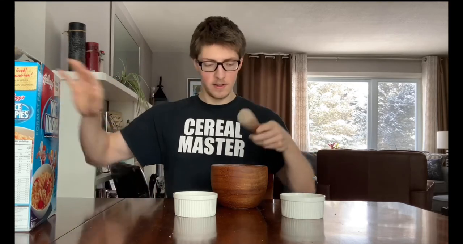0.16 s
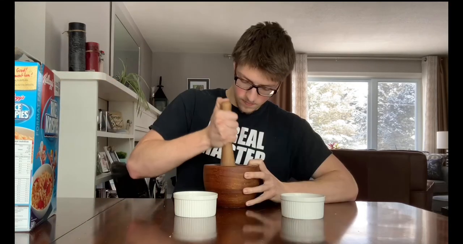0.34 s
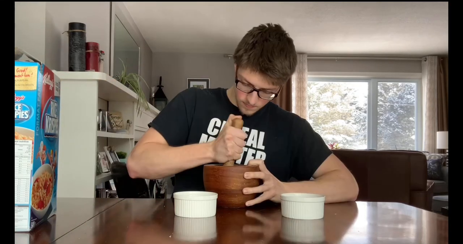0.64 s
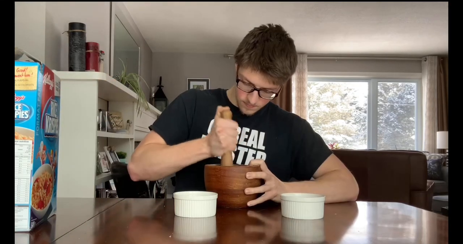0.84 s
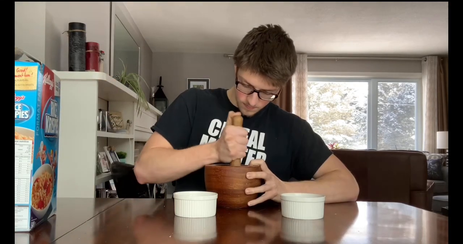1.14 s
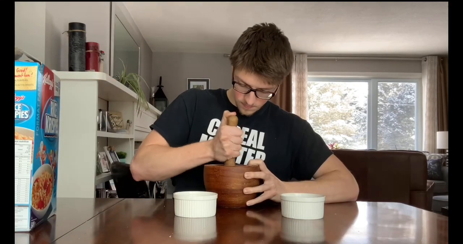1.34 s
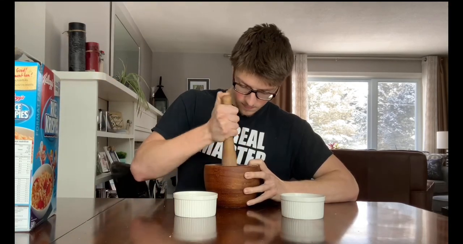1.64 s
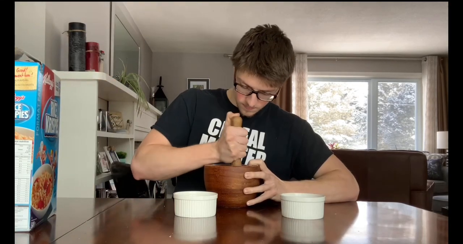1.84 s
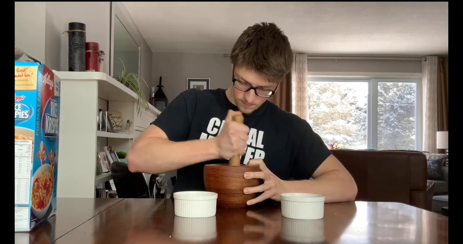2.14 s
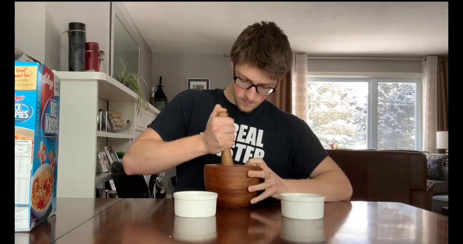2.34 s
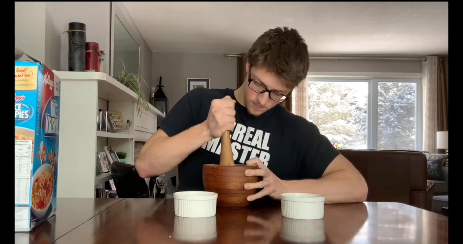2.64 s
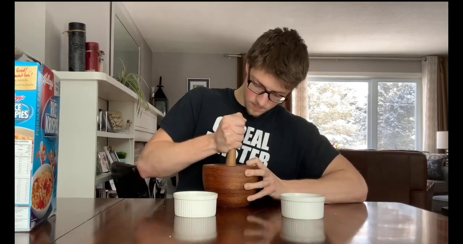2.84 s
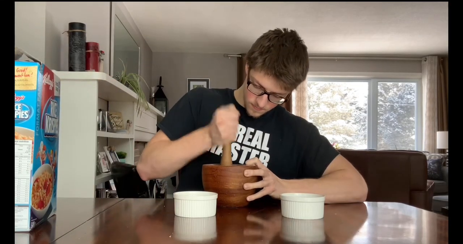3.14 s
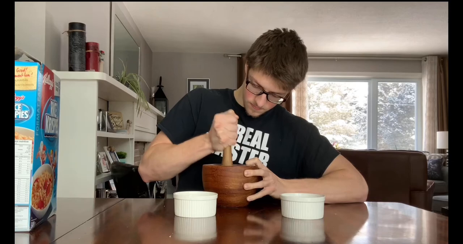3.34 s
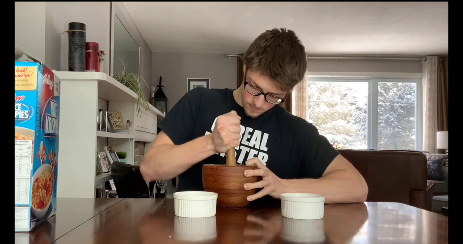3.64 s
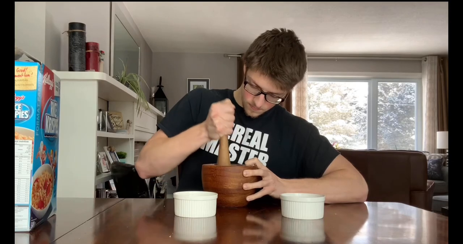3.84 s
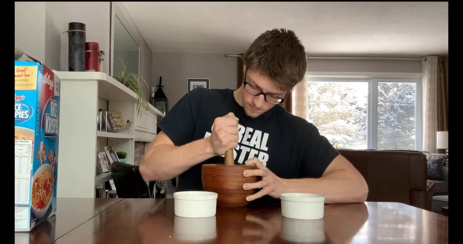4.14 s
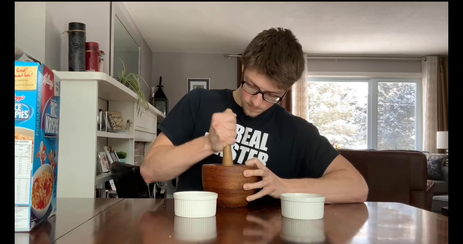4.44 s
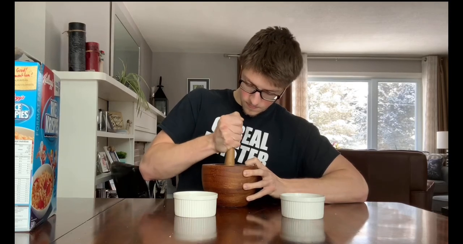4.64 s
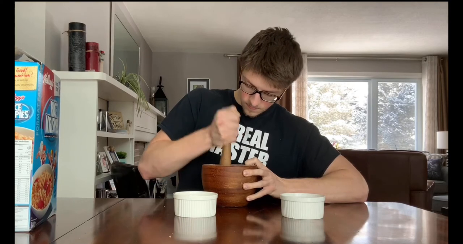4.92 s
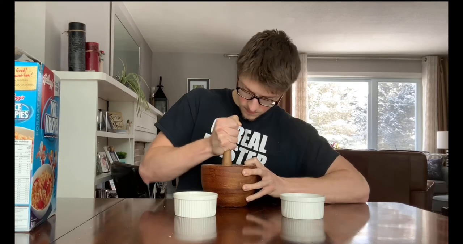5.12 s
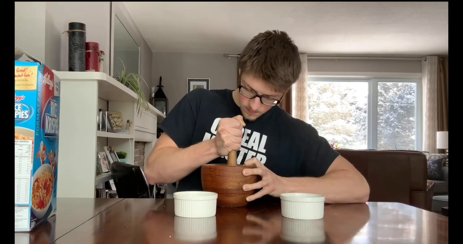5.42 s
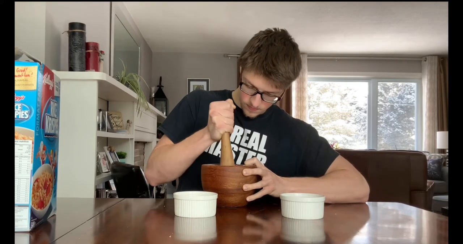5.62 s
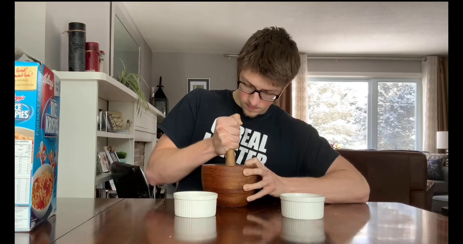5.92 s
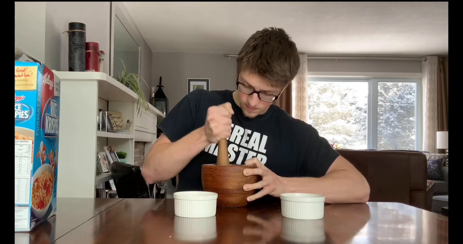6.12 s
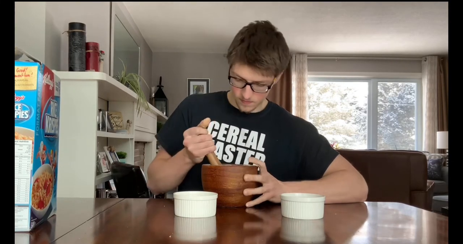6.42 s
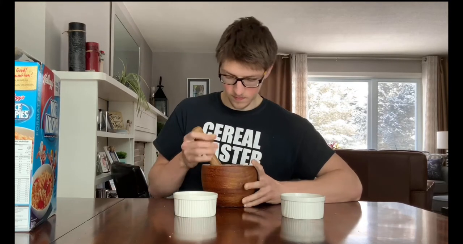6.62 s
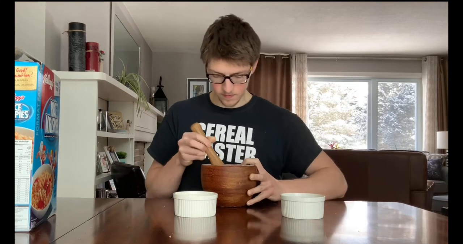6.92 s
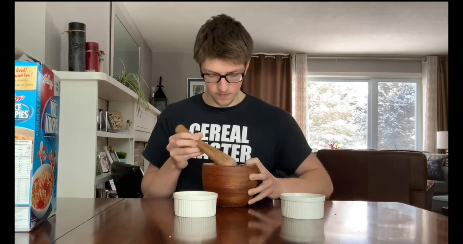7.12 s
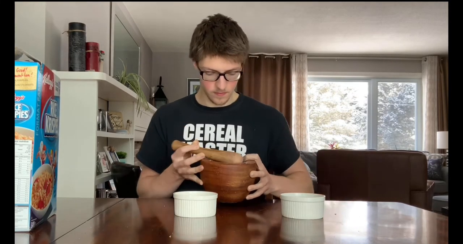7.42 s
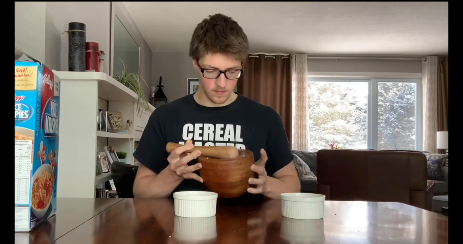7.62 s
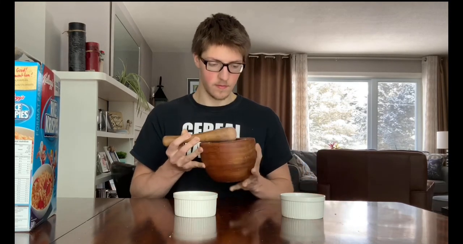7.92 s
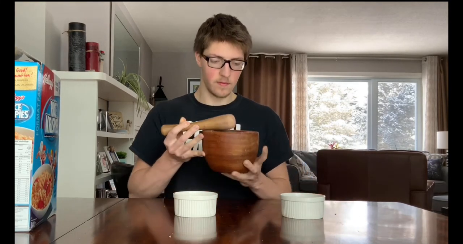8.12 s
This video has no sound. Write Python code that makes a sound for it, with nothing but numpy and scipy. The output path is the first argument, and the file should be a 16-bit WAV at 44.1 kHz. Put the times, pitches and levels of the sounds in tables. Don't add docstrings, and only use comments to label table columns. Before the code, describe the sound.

In a small living room, a wooden pestle crushes dry flakes in a wooden bowl on a table. Brittle crackling bursts come roughly twice a second, with gritty dragging and low wooden judder between them. After six seconds the crunching gives way to light taps, a faint slide and a hollow knock as the pestle rests on the rim. The stereo microphone is a metre or two away, over low fan rumble.

```python
import sys
import numpy as np
from scipy import signal
from scipy.fft import rfft, irfft, next_fast_len
from scipy.io import wavfile
from scipy.ndimage import uniform_filter1d

SR = 44100
rng = np.random.default_rng(int(sys.argv[2]) if len(sys.argv) > 2 else 0)


def linear_from_db(decibels):
    return 10 ** (np.asarray(decibels, float) / 20)


def to_wav(s):
    ch = np.atleast_2d(s).T
    pcm = np.round(np.clip(ch, -1, 1) * 32767)
    wavfile.write(sys.argv[1], SR, pcm.astype(np.int16))


N = 364707
SIZE = next_fast_len(N)


def level(x, db):
    return x * linear_from_db(db) / np.sqrt(np.mean(x ** 2))


def over_hz(points, size):
    hz, value = np.transpose(points)
    return np.interp(np.log(np.fft.rfftfreq(size, 1 / SR) + 1), np.log(hz + 1), value)


def colour(x, points, size=4096):
    cepstrum = irfft(np.log(linear_from_db(over_hz(points, size))))
    cepstrum[1:size // 2] *= 2
    cepstrum[size // 2 + 1:] = 0
    response = irfft(np.exp(rfft(cepstrum)))
    return signal.oaconvolve(x, response)[:len(x)]


def body(x, modes):
    total = 0
    for k, (hz, width, db) in enumerate(modes):
        total = total + (-1) ** k * linear_from_db(db) * signal.lfilter(*signal.iirpeak(hz, hz / width, SR), x)
    return total


def grains(rate, spread_db):
    hit = rng.random(N) < rate / SR
    size = np.minimum(rng.exponential(size=N), 4.5)
    return level(hit * rng.standard_normal(N) * linear_from_db(spread_db * size), 0)


def walk(rate):
    hold = int(SR / rate)
    steps = np.repeat(rng.standard_normal(N // hold + 1), hold)
    return 1.16 * uniform_filter1d(uniform_filter1d(steps, hold), hold)[:N]


def impulses(time_s, gains):
    push = np.zeros((len(gains), N))
    push[:, np.minimum((time_s * SR).astype(int), N - 1)] = gains
    return push


def power_sum_db(a_db, b_db):
    return 10 * np.log10(linear_from_db(a_db) ** 2 + linear_from_db(b_db) ** 2)


def swells(rows, rise_power, fall_power, rest_db=-100):
    t = np.arange(0, N / SR + .01, .001)
    start, peak_db, rise, fall = np.array(rows, float).T[:, :, None]
    up = np.clip((t - start) / np.maximum(rise, .002), 0, 1) ** rise_power
    down_db = -20 * (np.maximum(t - start - rise, 0) / np.maximum(fall, .005)) ** fall_power
    power = np.sum((up * linear_from_db(peak_db + down_db)) ** 2, axis=0) + linear_from_db(rest_db) ** 2
    return np.interp(np.arange(N) / SR, t, 10 * np.log10(power))


def room_tone():
    # (frequency [Hz], density [dB per Hz])
    room = [(25, -38), (40, -21.5), (78, -3), (93, 1.5), (106, -3), (120, -1.5), (135, -4.5), (180, -15),
            (260, -24.5), (450, -24), (700, -41), (1200, -34.5), (1550, -40), (2100, -53.5), (5000, -58.5),
            (9000, -51), (13000, -62), (15000, -67), (16000, -70)]
    # (frequency [Hz], likeness [0-1])
    likeness = [(100, 1), (250, 0.79), (450, 0), (1800, 0.24), (3000, 0.6), (4500, 0.6), (6500, .99)]
    # (frequency [Hz], width [Hz], level [dB], flicker
    # [dB])
    whistles = [(14520, 300, -78, 6), (9000, 2500, -87, 3)]
    mid, side = (colour(rng.standard_normal(N), room, size=16384) for _ in range(2))
    alike = np.clip(over_hz(likeness, SIZE), 0, 1)
    side = irfft(rfft(side, SIZE) * np.sqrt((1 - alike) / (1 + alike)), SIZE)[:N]
    air = level(np.array([mid + side, mid - side]), -42) * linear_from_db(1.1 * walk(3.144))
    for hz, width, db, flicker_db in whistles:
        tone = body(rng.standard_normal(N), [(hz, width, 0)])
        air = air + level(tone * linear_from_db(flicker_db * np.tanh(2 * walk(48))), db)
    return air


def efforts():
    # (start [s], crackle [dB], rise [s], fall to -20 dB [s])
    crushes = [(.1, -46, 0.0073, 0.43), (.335, -30, 0.035, 0.2), (.865, -29.5, 0.085, 0.13),
               (.98, -39, 0.095, 0.12), (1.25, -37.5, 0.0033, 0.22), (1.575, -26, 0.043, 0.0744),
               (2.16, -36, 0.06, 0.07), (2.386, -45.5, 0.0028, 0.37), (2.52, -29, 0.067, 0.08),
               (2.96, -29, 0.042, 0.1), (3.335, -31.5, 0.072, 0.24), (3.78, -27.5, 0.043, 0.09),
               (4.245, -29, 0.032, .1), (4.722, -28.5, 0.037, 0.06), (4.97, -40, 0.0067, 0.21),
               (5.182, -36.5, 0.009, 0.07), (5.46, -49, 0.0033, 0.24), (5.545, -34.5, 0.027, 0.1931),
               (5.8, -49, 0.0032, 0.17), (6.001, -46, 0.0035, 0.06), (6.01, -50, 0.027, 0.07),
               (6.11, -52, .006, 0.15), (6.14, -42, 0.0055, 0.01), (6.17, -49, 0.063, 0),
               (5.542, -40, .004, 0.19)]
    # (start [s], crackle [dB], rise [s], fall to -20 dB [s])
    drags = [(0, -60, 0.028, 0.2), (.56, -43, 0.14, 0.03), (.69, -43, 0.056, 0), (.76, -56, 0.015, .22),
             (1.215, -53, 0.023, 1.3), (1.4, -41, 0.062, 0.14), (1.66, -37.5, 0.079, 0.23),
             (1.78, -43.5, 0.12, 0.26), (2.06, -45.5, .1, 0.3), (2.64, -39, 0.081, 0.17),
             (2.78, -53.5, 0.055, 0), (3.05, -43, 0.029, 0.33), (3.4, -37.5, 0.084, 0.1),
             (3.5, -46, 0.18, .5), (3.63, -38, 0.075, 0.13), (3.85, -39, 0.054, 0.21),
             (4.01, -44, 0.087, 0.12), (4.15, -45.5, 0.1, -0.04), (4.29, -38.5, 0.14, 0.05),
             (4.46, -55.5, 0.042, .5), (4.79, -34, 0.057, 0.15), (5.22, -52.5, 0.033, 0.3)]
    # (start [s], crackle [dB], rise [s], fall to -20 dB [s])
    stirs = [(6.25, -60, 0.033, .15), (6.4, -68, 0.058, 0.4), (6.535, -62, 0.0044, 0),
             (6.62, -62, 0.082, 0.17), (6.83, -72, .08, 0.4), (7.0, -72, .05, 0.3),
             (7.17, -65.5, .08, -0.4), (7.29, -68, 0.038, -0.7), (7.5, -70.5, 0.12, -0.5),
             (7.645, -57, 0.043, 0.07), (7.77, -71, .03, .4)]
    # (start [s], judder [dB], rise [s], fall to -20 dB [s])
    presses = [(0, -43.5, 0.042, 0.06), (.1, -58, 0.0088, 0), (.34, -34.5, 0.05, 0.26),
               (.87, -36.5, 0.079, 0.34), (1.0, -37, 0.082, 0.11), (1.245, -39, 0.021, 0.2),
               (1.585, -35.5, 0.048, 0.19), (1.67, -35, 0.065, 0.17), (1.8, -37.5, 0.05, 0.17),
               (2.17, -41.5, 0.041, 0.12), (2.386, -50, 0.0067, 0.04), (2.52, -34.5, 0.069, 0.15),
               (2.66, -41.5, 0.033, 0.15), (2.97, -34, 0.04, 0.18), (3.34, -30.5, 0.15, .11),
               (3.65, -50.5, 0.035, 0.25), (3.785, -32.5, 0.042, 0.1843), (3.83, -32.5, 0.049, 0.1537),
               (4.25, -34, 0.031, 0.26), (4.33, -35, 0.099, -0.1), (4.725, -34.5, 0.051, 0.16),
               (4.8, -33, 0.061, 0.28), (4.96, -30, 0.042, 0.1431), (5.181, -34.5, 0.0072, 0.18),
               (5.46, -57.5, .006, 1), (5.54, -32, 0.041, 0.17), (5.59, -29.5, 0.049, 0.1031),
               (5.797, -40.5, 0.0065, 0.09), (6.02, -52, 0.045, 0.22), (6.17, -53, 0.058, 0.12)]
    # (start [s], judder [dB], rise [s], fall to -20 dB [s])
    slides = [
        (6.27, -54.5, 0.042, .1),
        (6.352, -53, .01, 0.05),
        (6.55, -65, 0.076, 7),
        (7.03, -50, 0.13, -0.14),
        (7.5, -70, .1, -2.5),
        (7.75, -65, .05, .5),
    ]
    # (start [s], scrape [dB], rise [s], fall to -20 dB [s])
    rubs = [
        (.865, -54, .02, 0.14),
        (1.565, -52.5, 0.016, 0),
        (2.08, -56, 0.09, 0.24),
        (7.72, -68, 0.07, 0),
        (8.2, -71, 0.093, 9),
    ]
    # (start [s], boom [dB], rise [s], fall to
    # -20 dB [s])
    bumps = [
        (.2, -61.5, 0.047, 0.5),
        (1.25, -43, 0.013, 0.2),
        (2.68, -43.5, 0.054, 0.14),
        (3.5, -46, .03, 0.15),
        (3.79, -40.5, .035, 0.12),
        (4.73, -41, 0.048, -0.27),
        (5.79, -43, 0.016, 0.12),
        (6.22, -52.5, 0.017, 0.5),
        (6.35, -46, 0.015, 0.01),
        (7.025, -38.5, 0.02, -0.02),
    ]
    moving_db = swells([*drags, *stirs], 0.84, 1.06, rest_db=-83)
    crackle_db = power_sum_db(swells(crushes, 0.85, 1.105), moving_db)
    judder_db = swells([*presses, *slides], 1.35, 1.33, rest_db=-67.5)
    scrape_share = 0.56
    scrape_db = scrape_share * crackle_db + (1 - scrape_share) * judder_db - 10
    scrape_db = power_sum_db(scrape_db, swells(rubs, 1.9, 1.9))
    boom_late_s = 0.0098
    late_db = np.interp(np.arange(N) - boom_late_s * SR, np.arange(N), judder_db)
    return crackle_db, judder_db, scrape_db, power_sum_db(late_db - 8, swells(bumps, 1.3, 1.96))


def grinding():
    # (frequency [Hz], level [dB])
    crackle_colour = [(2500, -54), (5200, -14.5), (6500, -5.5), (7800, -0.5), (9500, 0.5), (11500, -1.5),
                      (13500, -5.5), (15500, -9.5), (18000, -19)]
    # (frequency [Hz], width [Hz], level [dB])
    wall_modes = [(1505, 205, 3), (1840, 380, 1), (2256, 610, -3), (2930, 420, -1.5), (3554, 310, 1.5),
                  (4520, 440, -1.5), (5940, 1270, -6.5)]
    # (frequency [Hz], width [Hz], level [dB])
    table_modes = [(348.5, 22.5, 3.5), (475.6, 16.5, 2.5), (531.5, 25, -2), (606, 32, 2), (695, 51, -1.5),
                   (751, 28.6, 3.5), (790.5, 30, 0.5), (860, 64, -1), (1055, 146, -7), (1283, 250, -15),
                   (1530, 100, -16), (1750, 230, -22)]
    # (frequency [Hz], width [Hz], level [dB])
    boom_modes = [(166, 35, -7), (228.3, 14, -0.5), (280.1, 15.3, 4)]
    crackle_db, judder_db, scrape_db, boom_db = efforts()
    uneven_db = 0.66 * walk(40)
    snaps = colour(grains(20000, spread_db=-2.0), crackle_colour)
    sizes = [(6290, 1500, 0), (8160, 3000, 0), (10360, 4200, 0.0086), (14600, 4700, 0)]
    snaps = sum(body(snaps, [size]) * linear_from_db(3.16 * walk(30) + 2.0 * walk(200)) for size in sizes)
    crackle = level(snaps, 0) * linear_from_db(crackle_db + uneven_db)
    grit = level(body(grains(5000, spread_db=1.5), wall_modes), 3.55)
    scrape = grit * linear_from_db(scrape_db + uneven_db + 1.63 * walk(60))
    slips = grains(900, spread_db=2.0)
    flake_modes = [(2190, 3900, -1.5), (4200, 4200, -3.5), (7040, 3800, -1.5)]
    flakes = level(body(grains(160, spread_db=1.0), flake_modes), -6.5) * linear_from_db(scrape_db)
    judder = level(body(slips, table_modes), 0.52) * linear_from_db(judder_db + 1.76 * walk(30))
    boom = level(body(slips, boom_modes), 1.0) * linear_from_db(boom_db)
    return crackle + scrape + flakes + judder + boom


def taps():
    # (time [s], ring [dB], thud minus ring [dB], snap minus ring [dB])
    tap_rows = [(0.0233, -45, 5, -5), (0.3182, -19, -17, -31.5), (0.7602, -62, 7, 7), (1.254, -45, 13, 12),
                (2.386, -47, 4, 0), (4.9785, -42, 12, 11), (5.1831, -37, 11, 7), (5.464, -31.5, -8, -0.5),
                (5.4894, -45, -11, -7.5), (5.5144, -43.5, -12, 3), (5.8047, -43, 10.5, 10),
                (6.0057, -47, -7.5, 0), (6.0244, -48.5, 1, 0), (6.0422, -51, -7, 3),
                (6.112, -44.5, -14, -7), (6.1244, -49, -12, -3), (6.1449, -36.5, -18, -3),
                (6.2053, -45, -5, 1), (6.2148, -51, -8, -7), (6.2404, -50, 7, -3), (6.538, -49, -12, 2),
                (6.6544, -55, -8, -2), (6.9785, -48, -1, -13), (7.6036, -72, -4, -3),
                (7.822, -54, -11, -25), (7.853, -51, -12, -25), (8.018, -54.5, -12, -26)]
    # (time [s], ring [dB], thud minus ring [dB], snap minus ring [dB])
    last_tap = (8.268, -32, 11, -5)
    # (frequency [Hz], width [Hz], level [dB])
    bowl_modes = [(1430, 200, -18), (1640, 45, -16), (1465, 60, -3), (1760, 80, -22), (1535, 28, -8)]
    # (frequency [Hz], width [Hz], level [dB])
    thud_modes = [(352, 25, -7), (530, 30, -6), (625, 22, -7), (677, 34, -2), (733, 45, -3), (790, 36, -8),
                  (700, 300, -8), (1020, 170, -10)]
    # (frequency [Hz], width [Hz], level [dB])
    rim_modes = [(3697, 74, 9), (4500, 94, 0)]
    time_s, ring_db, thud_db, snap_db = np.transpose([*tap_rows, last_tap])
    ring, thud, crumb = impulses(time_s, linear_from_db([ring_db, ring_db + thud_db, ring_db + snap_db]))
    t = np.arange(600) / SR
    burst = rng.standard_normal(len(t)) * np.exp(-t / 0.0019)
    snap = signal.oaconvolve(crumb, burst)[:N]
    snap = signal.lfilter(*signal.butter(2, [1500, 10000], "band", fs=SR), snap)
    wood = linear_from_db(41.5) * body(ring, bowl_modes) + linear_from_db(38.5) * body(thud, thud_modes)
    wood = signal.sosfilt(signal.butter(8, 1850, fs=SR, output="sos"), wood)
    return wood + linear_from_db(-1.0) * snap + linear_from_db(23.0) * body(crumb, rim_modes)


def singing():
    # (frequency [Hz], width [Hz])
    wall_tones = [(1520, 64), (3620, 70), (4500, 50)]
    # (start [s], level [dB], rise [s], fall to -20 dB [s])
    sings = [
        [(5.468, -54, .01, .09), (5.56, -52, .03, .15), (6.003, -57, .02, .04), (6.112, -59, .02, .12),
         (6.2, -59, .02, .03)],
        [(4.74, -53, .04, .2), (4.968, -47, .008, .12), (5.183, -51, .006, 0.092), (5.468, -56, .01, .08),
         (5.68, -55, .03, .08), (5.8, -52.5, .006, 0.089)],
        [(4.76, -53, .05, .2), (4.99, -56, .03, .1), (5.56, -46, .04, .12), (5.8, -59, .01, 0.088),
         (6.14, -58, .004, .012)],
    ]
    grit = grains(1500, spread_db=2.1)
    total = 0
    for (hz, width), rows in zip(wall_tones, sings):
        total = total + level(body(grit, [(hz, width, 0)]), 0) * linear_from_db(swells(rows, 1.1, 1.04))
    return total


def clicks():
    # (time [s], level [dB])
    cracks = [
        (6.003, -46),
        (6.145, -44),
        (6.2345, -47),
        (6.2404, -36.5),
        (7.603, -60),
        (8.268, -39),
    ]
    time_s, db = np.transpose(cracks)
    t = np.arange(200) / SR
    burst = rng.standard_normal(len(t)) * np.exp(-t / 0.00096)
    crack = signal.oaconvolve(impulses(time_s, [linear_from_db(db)])[0], burst)[:N]
    return signal.lfilter(*signal.butter(1, 700, "high", fs=SR), crack)


def trickle():
    # (start [s], level [dB], rise [s], fall to -20 dB [s])
    slips = [
        (6.24, -67, .06, 0.2),
        (6.66, -73, .05, 0),
        (7.04, -66.5, 0.057, 0.4),
        (7.16, -66, 0.07, .09),
    ]
    ticks = body(grains(400, spread_db=2), [(8300, 380, 0)])
    return level(ticks, 0) * linear_from_db(swells(slips, 2.1, 0.72))


def laid_down():
    # (time [s], level [dB], ring-out share [0-1], handle minus blow [dB])
    contacts = [
        (7.0255, -20.5, 1.0, -28),
        (7.1935, -40.5, 0.3, 11),
    ]
    # (frequency [Hz], width [Hz], level [dB])
    blow_modes = [(690, 130, 1.5), (1010, 250, -4), (1493, 64, -6.5), (1800, 300, -14)]
    # (frequency [Hz], width [Hz], level [dB])
    ring_modes = [(280, 20, -30), (437, 7.8, -28), (514, 28, -21.5), (630, 10, -25), (672, 8, -23),
                  (781, 14, -27), (1012, 15, -35), (1180, 15, -35), (1405, 13, -32), (1470, 11, -30)]
    # (frequency [Hz], width [Hz], level [dB])
    handle_modes = [(520, 100, -4), (1000, 180, -1), (1500, 200, -5.5), (1850, 300, -14)]

    def unit(modes):
        return [(hz, width, db - 20 * np.log10(2 * np.pi * width / SR)) for hz, width, db in modes]

    time_s, db, share, handle_db = np.transpose(contacts)
    gains = linear_from_db(db) * np.array([np.ones_like(db), np.clip(share, 0, 1), linear_from_db(handle_db)])
    blow, ring, clack = impulses(time_s, gains)
    wood = body(blow, unit(blow_modes)) + linear_from_db(6.0) * body(ring, unit(ring_modes))
    wood = wood + body(clack, unit(handle_modes))
    return signal.sosfilt(signal.butter(6, 2000, fs=SR, output="sos"), wood)


def echoes(x, t60_s, wet_db, damp_hz):
    t = np.arange(int(.6 * SR)) / SR
    tail = rng.standard_normal((2, len(t))) * linear_from_db(-60 * t / t60_s) * np.minimum(t / 0.0043, 1)
    tail = signal.lfilter(*signal.butter(1, damp_hz, fs=SR), tail)
    tail = tail / np.sqrt(np.sum(tail ** 2) / 2)
    return linear_from_db(wet_db) * signal.oaconvolve(x[None], tail, axes=1)[:, :N]


def ports(x, diffuse):
    # (frequency [Hz], left lead [rad])
    port_lead = [(300, 0), (860, 1.0), (1700, 0), (2350, -1.4), (2800, -3.14), (3300, -4), (4300, -6),
                 (7300, -5.6), (8200, -6.28)]
    # (frequency [Hz], level of the sum [dB])
    notch = [(2350, -0.5), (2600, -3), (2800, -1.5), (3000, -1.4), (3250, 0)]
    turn = np.exp(.5j * over_hz(port_lead, SIZE))
    pair = rfft(x, SIZE) * np.array([turn, 1 / turn]) + rfft(diffuse, SIZE)
    pair = pair - pair.mean(axis=0) * (1 - linear_from_db(over_hz(notch, SIZE)))
    return irfft(pair, SIZE)[:, :N]


def scene():
    rub, knock = grinding() + trickle(), taps()
    diffuse = echoes(rub, 0.099, wet_db=-6.5, damp_hz=10000)
    diffuse = diffuse + echoes(knock, 0.31, wet_db=-7, damp_hz=5100)
    air, wall, laid = room_tone(), singing(), laid_down() + clicks()
    diffuse = diffuse + echoes(laid, 0.3, wet_db=-10.5, damp_hz=4000)
    diffuse = diffuse + echoes(wall, 0.1, wet_db=-7, damp_hz=9000)
    return ports(rub + knock + wall + laid, diffuse) + air


def top_cut(x):
    return signal.sosfilt(signal.butter(12, 16120, fs=SR, output="sos"), x)


def record(dry):
    # (frequency [Hz], left minus right [dB])
    port_tilt = [(60, -0.5), (110, 4.5), (200, 5.5), (380, 5), (700, 6.5), (1290, 3), (2380, -1.5),
                 (4400, 0), (8120, -2), (15000, -6)]
    # (frequency [Hz], level [dB])
    side_colour = [(60, -4), (300, -4), (2000, 1), (3000, -0.5), (3700, -2), (4400, 1.5), (5500, 0.5),
                   (8000, 0)]
    hz = np.fft.rfftfreq(SIZE, 1 / SR)
    tilt = linear_from_db(over_hz(port_tilt, SIZE) / 2)
    left, right = rfft(dry, SIZE) * np.array([tilt, 1 / tilt])
    side = (left - right) / 2 * linear_from_db(over_hz(side_colour, SIZE))
    side = side * np.where(hz < 8150, 1, linear_from_db(-11))
    mid = (left + right) / 2 * (hz < 15850)
    mix = irfft(np.array([mid + side, mid - side]), SIZE)[:, :N]
    return top_cut(mix)


dry = scene()
out = record(dry)
to_wav(out)
```